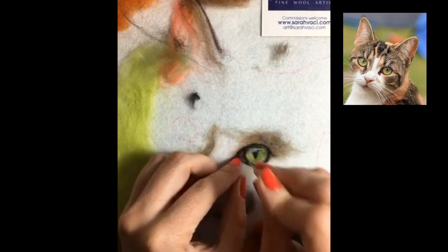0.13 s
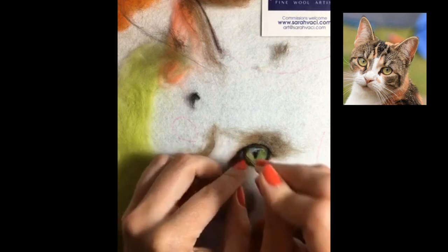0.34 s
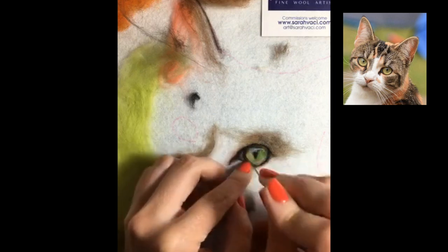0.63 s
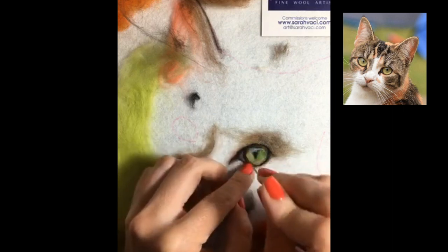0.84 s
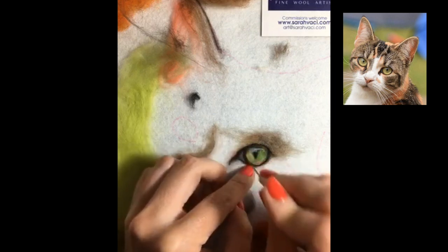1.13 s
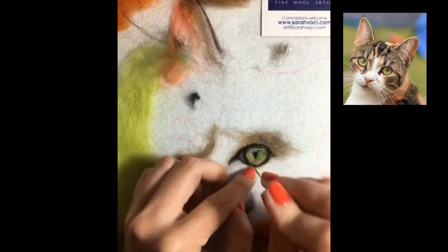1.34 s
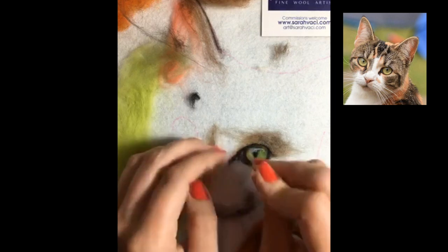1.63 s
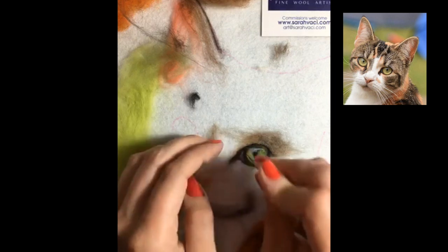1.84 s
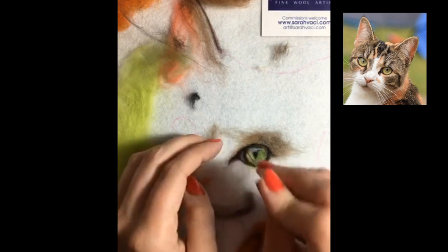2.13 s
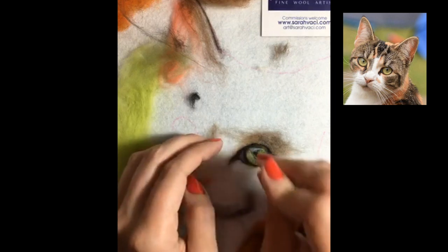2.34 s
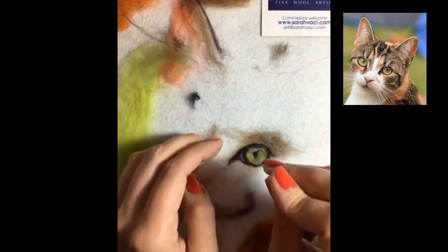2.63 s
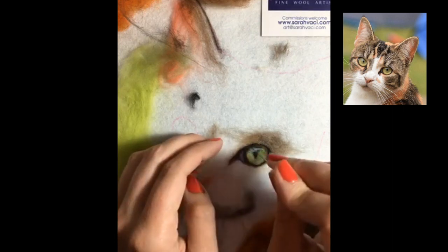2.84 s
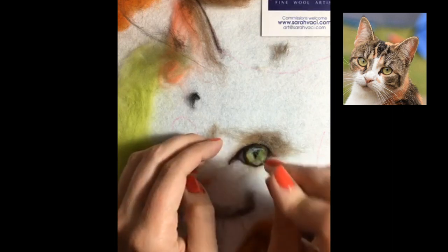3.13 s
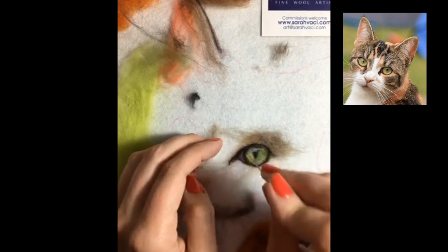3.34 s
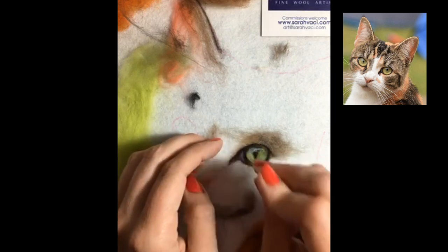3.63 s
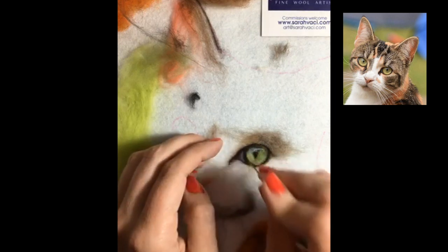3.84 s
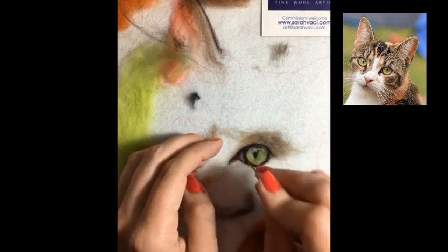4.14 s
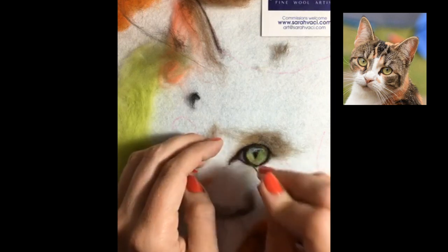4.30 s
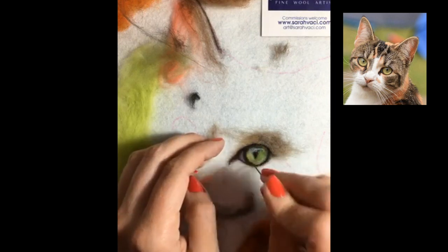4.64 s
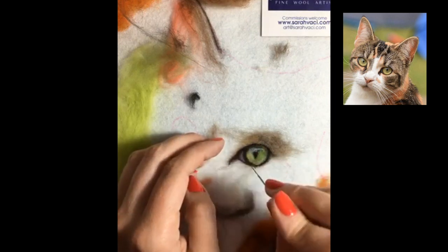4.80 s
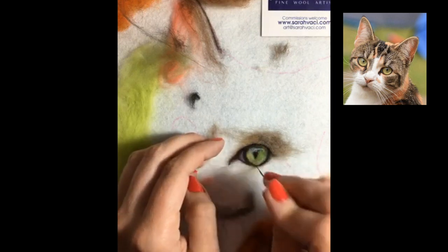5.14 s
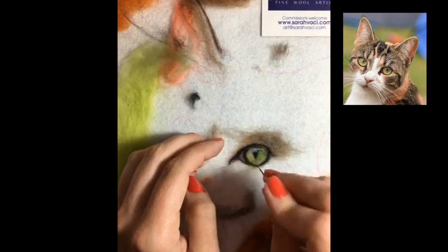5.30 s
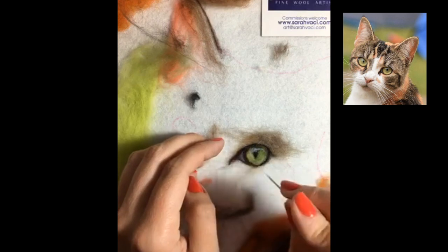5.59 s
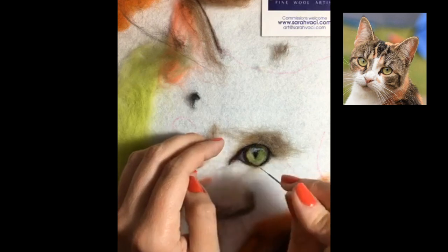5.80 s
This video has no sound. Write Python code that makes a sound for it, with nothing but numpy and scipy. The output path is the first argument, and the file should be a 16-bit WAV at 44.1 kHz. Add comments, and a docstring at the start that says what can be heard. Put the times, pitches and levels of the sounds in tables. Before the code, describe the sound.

A barbed felting needle jabs quickly into wool on a foam pad, making small, even crunches over a faint room hum.

```python
"""Needle felting, close up. Room rumble, a low hum and microphone hiss run throughout. From the start a
barbed needle jabs wool on a foam pad, 5-6 times a second. Each stab crunches: fibres catch on the barbs
and snap, thudding in the pad and fizzing above it; a softer scrape follows on the way out. The hum swells
near 1.6 s, then sinks in pitch. The needle pauses near 2.5 s, fingers brush the wool, and it resumes.
It pauses again near 4.8 s and stops at 5.5 s; three more brushes end the scene."""
import sys
import numpy as np
from scipy import signal
from scipy.fft import rfft, irfft
from scipy.io import wavfile

SR = 44100
rng = np.random.default_rng(int(sys.argv[2]) if len(sys.argv) > 2 else 0)


def dump(signal):
    """Clip the signal to [-1, 1] and save it as 16-bit WAV at the path in sys.argv[1]."""
    limited = np.clip(np.atleast_2d(signal).T, -1, 1)
    pcm = np.round(limited * 32767).astype(np.int16)
    wavfile.write(sys.argv[1], SR, pcm)


N = 262836

# room rumble spectrum: freq_hz, gain_db
RUMBLE_COLOUR = [(47, -30), (80, -6), (110, -5), (178, -14.5), (451, -25), (491, -26.5), (529, -24),
                 (1500, -32), (1950, -78), (3300, -120)]
# microphone hiss spectrum: freq_hz, gain_db
HISS_COLOUR = [(880, -54), (1500, -3), (1920, -1), (2010, -7.5), (2170, -1.5), (2350, -3.5), (2570, -3),
               (3410, -3), (3990, -5), (4890, -7.5), (6070, -3.5), (6690, -5.5), (11800, -2.5), (15500, -2)]
# hum fundamental, relative level: time_s, level_db
HUM_LEVEL = [(0, -48), (0.3, -45.5), (0.6, -55), (0.9, -49.5), (1.15, -58.5), (1.47, -54.5), (1.64, -40),
             (1.76, -53), (2.2, -55), (2.33, -45), (2.45, -59), (3.7, -54), (5.96, -57.5)]
# hum fundamental: time_s, pitch_hz
HUM_PITCH = [(0, 60.27), (1.6, 60), (2, 55.22), (5.96, 56.3)]
# hum second harmonic: time_s, level_db
HUM_OVERTONE = [(0, -54), (1, -64.5), (2.2, -74.5), (5.96, -69)]
# brushed wool spectrum: freq_hz, gain_db
WOOL_COLOUR = [(500, -9), (3500, -15), (8500, -13), (10500, -11), (12500, -1), (15000, 0.5)]
# finger strokes: centre_s, sigma_s, level_db
BRUSHES = [(2.666, 0.011, -57), (5.782, 0.022, -53), (5.868, 0.015, -52), (5.905, 0.018, -56)]
# resonances of pad and table: freq_hz, width_hz, gain_db
PAD_MODES = [(240, 62, 0.5), (381, 143, -13), (641, 45, -6.5), (791, 139, -8), (908, 142, -8.5),
             (1128, 46, -10.5), (1546, 308, -10), (2975, 550, -16), (3415, 363, -18)]
# pad response between resonances: freq_hz, gain_db
PAD_FLOOR = [(30, -20), (70, 0), (150, -12.5), (500, -11), (1200, -20), (2200, -32), (4000, -27),
             (8000, -28.5), (16000, -29.5)]
# pad's hollow 1.5 kHz resonance as the needle moves on: time_s, offset_db
PAD_HOLLOW = [(0.1, 2), (1.8, 1), (4.0, -0.5), (5.1, -3)]
# breaking fibre spectrum: freq_hz, gain_db
FIBRE_COLOUR = [(300, -10), (2000, -10.5), (3200, -25), (4100, -10), (4900, -6), (5400, 0.5), (5950, -5.5),
                (6600, 1.5), (7600, -6), (8900, 0), (10500, -4), (15000, 0.5)]
# spectrum of the shaft rubbing felt: freq_hz, gain_db
SHAFT_COLOUR = [(300, -42), (900, -14), (1600, 4), (2200, 1.5), (3100, -1.5), (4500, -1.5), (6400, -1.5),
                (8000, -9.5), (15000, -11.5)]
# thick tufts snapping, relative levels: time_s, thud_db, tick_db
THICK_TUFTS = [(0.271, -35, -52), (0.4599, -39.5, -50), (0.654, -39.5, -46), (0.851, -48, -49),
               (1.0174, -34, -39.5), (1.1737, -39.5, -51), (1.184, -36.5, -42.5), (1.3585, -36, -52),
               (1.5632, -36.5, -41), (1.5711, -44.5, -32.5), (1.7348, -33.5, -45), (1.753, -38.5, -39.5),
               (1.9448, -38, -38), (2.103, -40, -46), (2.1315, -36, -37.5), (2.281, -44.5, -48),
               (2.819, -38.5, -52), (2.8461, -44.5, -42.5), (2.9896, -34.5, -57), (3.01, -34, -37),
               (3.0198, -42.5, -44), (3.1742, -37.5, -60), (3.193, -36, -54), (3.355, -53, -43),
               (3.3918, -52, -38.5), (3.558, -37, -41), (3.7164, -36.5, -45), (3.7462, -39.5, -47),
               (3.8963, -43, -37), (4.0888, -37.5, -42), (4.2444, -38, -43.5), (4.5981, -48, -40.5),
               (5.0765, -53, -43.5), (5.1171, -49.5, -52), (5.218, -41.5, -39), (5.2393, -40.5, -42.5),
               (5.4086, -39.5, -44)]
# needle strokes, relative pad and fibre levels: enter_s, descent_s, crunch_db, fizz_db
STABS = [(0.078, 0.036, -47.5, -51.5), (0.267, 0.029, -45, -52.5), (0.453, 0.023, -46.5, -53),
         (0.632, 0.028, -49.5, -52), (0.815, 0.031, -48.5, -55), (0.992, 0.038, -48.5, -52),
         (1.17, 0.039, -47, -50), (1.355, 0.043, -47, -52), (1.542, 0.045, -46.5, -50),
         (1.73, 0.045, -45, -52.5), (1.912, 0.052, -47.5, -50.5), (2.104, 0.034, -44.5, -47.5),
         (2.277, 0.044, -45.5, -51.5), (2.767, 0.012, -56, -70), (2.816, 0.027, -50.5, -57),
         (2.989, 0.043, -45.5, -50), (3.17, 0.038, -45, -51), (3.349, 0.037, -43.5, -58),
         (3.531, 0.039, -46.5, -49), (3.711, 0.042, -45.5, -49), (3.886, 0.038, -44, -48),
         (4.058, 0.036, -44.5, -49), (4.227, 0.028, -45.5, -53.5), (4.394, 0.031, -45, -53),
         (4.558, 0.038, -46.5, -51), (5.026, 0.039, -47, -54), (5.214, 0.037, -45, -50.5),
         (5.389, 0.039, -45.5, -49.5)]


def gain_of(db):
    """Decibels to amplitude."""
    return 10 ** (np.asarray(db) / 20)


def unit_rms(x):
    """Scales to rms 1."""
    return x / np.sqrt(np.mean(x ** 2) + 1e-20)


def colour_gain(colour, hz):
    """Amplitude of a spectrum table, interpolated over log frequency."""
    freq_hz, gain_db = np.transpose(colour)
    return gain_of(np.interp(np.log(hz + 1), np.log(freq_hz + 1), gain_db))


def add(mix, start_s, sound):
    """Mixes a sound in at start_s."""
    part = mix[max(round(start_s * SR), 0):][:len(sound)]
    part += sound[:len(part)]


def drift(rate_hz):
    """Slow random motion, rms 1."""
    hz = np.fft.rfftfreq(N, 1 / SR)
    return unit_rms(irfft(rfft(rng.standard_normal(N)) * np.exp(-(hz / rate_hz) ** 2), N))


def response(colour, modes=(), size=4096):
    """Minimum-phase impulse response, energy 1: broad colour plus resonances."""
    hz = np.fft.rfftfreq(size, 1 / SR)
    power = colour_gain(colour, hz) ** 2
    for centre_hz, width_hz, db in modes:
        power += gain_of(db) ** 2 / (1 + 2 * ((hz - centre_hz) / width_hz) ** 2) ** 2
    cepstrum = irfft(np.log(power) / 2)
    cepstrum[1:size // 2] *= 2
    cepstrum[size // 2 + 1:] = 0
    ring = irfft(np.exp(rfft(cepstrum)))[:size // 2]
    return ring / np.linalg.norm(ring)


def through(x, ring):
    """Convolves with an impulse response."""
    return signal.oaconvolve(x, ring)[:N]


def steady_noise(colour, level_db):
    """Coloured noise at a constant rms level."""
    gain = colour_gain(colour, np.fft.rfftfreq(N, 1 / SR))
    return gain_of(level_db) * unit_rms(irfft(rfft(rng.standard_normal(N)) * gain, N))


def hum(trim_db=-1.5, waver_hz=2.476, flutter_db=2.5, sway_db=2.5):
    """Low room hum: swells, sways and wavers, with a rough overtone."""
    t = np.arange(N) / SR
    curves = HUM_LEVEL, HUM_PITCH, HUM_OVERTONE
    level_db, pitch_hz, overtone_db = (np.interp(t, *np.transpose(curve)) for curve in curves)
    phase = 2 * np.pi * np.cumsum(pitch_hz + waver_hz * drift(rate_hz=7.6)) / SR
    wobble_db = sway_db * drift(rate_hz=14.6) + flutter_db * drift(rate_hz=50)
    fundamental = gain_of(level_db + trim_db + wobble_db) * np.sin(phase)
    overtone = gain_of(overtone_db + 2 * drift(rate_hz=16)) * np.sin(2 * phase + drift(rate_hz=11))
    return np.sqrt(2) * (fundamental + overtone)


def room(x, wet_db=-16, t60_s=0.26, cutoff_hz=2000, echoes_per_s=3000, predelay_s=0.003):
    """Adds the faint, dull reflections of a small furnished room."""
    t = np.arange(SR // 3) / SR
    taps = rng.standard_normal(len(t)) * (rng.random(len(t)) < echoes_per_s / SR) * (t > predelay_s)
    tail = taps * gain_of(-60 * t / t60_s)
    tail = signal.lfilter(*signal.butter(1, cutoff_hz, fs=SR), tail / np.linalg.norm(tail))
    return x + gain_of(wet_db) * through(x, tail)


def fibre_slips(per_s, size, clump_db=3.0, clump_s=0.0016, spread_db=3.5):
    """Single fibres slip in bunches: random clicks, a few much larger than the rest; rms 1."""
    bunches = np.convolve(rng.standard_normal(size), np.hanning(round(2 * clump_s * SR)), "same")
    heights = gain_of(spread_db * np.minimum(rng.exponential(1, size), 3))
    clicks = heights * rng.choice([-1, 1], size) * (rng.random(size) < per_s / SR)
    return unit_rms(clicks * gain_of(clump_db * unit_rms(bunches)))


def finger_brushes():
    """Fingertips slide over loose wool: a faint, high rustle."""
    t = np.arange(N) / SR
    touch = sum(gain_of(db) * np.exp(-((t - centre_s) / sigma_s) ** 2 / 2)
                for centre_s, sigma_s, db in BRUSHES)
    slips = fibre_slips(per_s=6100, size=N, clump_db=5.5, clump_s=0.0017)
    return through(touch * slips, response(WOOL_COLOUR))


def pad_spot(time_s, detune=0.02):
    """Impulse response of one spot on the pad; each tunes and weights the resonances differently."""
    scatter = rng.standard_normal((len(PAD_MODES), 2))
    hollow_db = np.interp(time_s, *np.transpose(PAD_HOLLOW))
    modes = [(hz * (1 + detune * shift), width_hz, db + offset_db + hollow_db * (1400 < hz < 1700))
             for (hz, width_hz, db), (shift, offset_db) in zip(PAD_MODES, scatter)]
    return response(PAD_FLOOR, modes)


def pull_out(enter_s, descent_s, linger_s=0.04, usual_s=0.04, usual_db=-56.5, db_per_s=233):
    """Peak time and base level of the exit scrape; a longer, deeper stab scrapes louder."""
    return enter_s + descent_s + linger_s, usual_db + db_per_s * (descent_s - usual_s)


def thin_tufts(stab_row, count=2, spread_db=3.0, tilt_db=7.5, pierce_s=0.005, catch_jitter_s=0.0072):
    """Small snaps: the tip pierces the felt's skin, tufts tear going down, a barb catches coming out."""
    enter_s, descent_s, crunch_db, fizz_db = stab_row
    pierce = enter_s + pierce_s, crunch_db + 4, fizz_db + 0.5
    depth = (np.arange(count) + 1 + rng.random(count)) / (count + 1)
    thud_db, tick_db = 0.5 + spread_db * np.clip(rng.standard_normal((2, count)), -2, 2)
    depth_db = tilt_db * (depth - .5)  # deeper: less thud, more tick
    tears = zip(enter_s + descent_s * depth, crunch_db + thud_db - depth_db, fizz_db + tick_db + depth_db)
    exit_s, pull_db = pull_out(enter_s, descent_s)
    lateness, strength = np.clip(rng.standard_normal(2), -2, 2)
    catch_db = pull_db + 1 + spread_db * strength
    catch = exit_s + catch_jitter_s * lateness, catch_db, catch_db - 1.5
    return [pierce, *tears, catch]


def snap(tuft, pad_ring, fibre_ring, thud_trim_db=-1, thud_rise_s=0.00073, tick_rise_s=0.00049,
         strain_db=-13, strain_s=0.0031):
    """A tuft strains, then tears: a brief thud in the pad and a shorter, bright tick."""
    time_s, thud_db, tick_db = tuft
    t = np.arange(-SR // 200, SR // 150) / SR
    strain = gain_of(strain_db) * np.exp(-abs(t) / strain_s)
    thud = pad_ring, thud_db + thud_trim_db, thud_rise_s
    tick = fibre_ring, tick_db, tick_rise_s
    sound = 0
    for ring, db, rise_s in thud, tick:
        age = np.maximum(t / rise_s + .5, 0)
        force = age * np.exp(1 - age) + strain
        burst = through(force * rng.uniform(-1.012, 1, len(t)), ring)
        sound += gain_of(db) * burst / np.linalg.norm(burst)
    return time_s + t[0], np.sqrt(.003 * SR) * sound  # levels are rms over 3 ms


def stab(stab_row, pad_ring, fibre_ring, touch_db=-14, touch_lead_s=0.013, touch_s=0.0034,
         press_db=-5, press_s=0.032, relax_db=-8, relax_s=0.008, trim_db=-1,
         pull_s=0.016, pull_pad_db=-2, pull_shaft_db=-6.5):
    """One stroke: the tip scratches the loose top layer, presses, sinks in, stops and is drawn out."""
    enter_s, descent_s, crunch_db, fizz_db = stab_row
    stop_s = enter_s + descent_s
    exit_s, pull_db = pull_out(enter_s, descent_s)
    t = enter_s + np.arange(-SR // 15, SR // 5) / SR
    age_s = t - enter_s
    touch = gain_of(touch_db) * np.exp(-((age_s + touch_lead_s) / touch_s) ** 2 / 2)
    press = gain_of(press_db) * np.exp(-(age_s / press_s) ** 2 - abs(age_s) / press_s)
    relax = gain_of(relax_db) * np.exp(-abs(t - stop_s) / relax_s)
    stroke = np.where(t < enter_s, press, np.where(t < stop_s, 1, relax))
    pull = gain_of(pull_db) * np.exp(-((t - exit_s) / pull_s) ** 2 / 2)
    # deeper: the pad shakes less, more barbs rake the fibres
    depth = np.clip(age_s / descent_s, 0, 1) - .5
    pad_drive = gain_of(crunch_db + trim_db - 4.6 * depth) * stroke + gain_of(pull_pad_db) * pull
    fibre_drive = gain_of(fizz_db + trim_db + 7.4 * depth) * (stroke + touch)
    shaft_drive = gain_of(crunch_db) * touch + gain_of(pull_shaft_db) * pull
    coarse = fibre_slips(per_s=5000, size=len(t))
    fine = fibre_slips(per_s=20000, size=len(t))
    crunch = through(pad_drive * coarse, pad_ring)
    fizz = through(fibre_drive * unit_rms(fine + 0.12 * coarse), fibre_ring)
    rub = through(shaft_drive * unit_rms(fine + 0.39 * coarse), response(SHAFT_COLOUR))
    return t[0], crunch + fizz + rub


def needle():
    """All stabs; each tuft thuds through the pad spot of the stab that tears it."""
    mix = np.zeros(N)
    fibre_ring = response(FIBRE_COLOUR)
    entries_s = np.array(STABS)[:, 0]
    pad_rings = [pad_spot(enter_s) for enter_s in entries_s]
    for stab_row, pad_ring in zip(STABS, pad_rings):
        add(mix, *stab(stab_row, pad_ring, fibre_ring))
        for tuft in thin_tufts(stab_row):
            add(mix, *snap(tuft, pad_ring, fibre_ring))
    for tuft in THICK_TUFTS:
        nearest = np.argmin(abs(entries_s - tuft[0]))
        add(mix, *snap(tuft, pad_rings[nearest], fibre_ring))
    return mix


def scene():
    """Needle and fingers over hum, rumble and hiss; mono."""
    mix = room(needle()) + finger_brushes() + hum()
    mix += steady_noise(RUMBLE_COLOUR, level_db=-60)
    mix += steady_noise(HISS_COLOUR, level_db=-63.5)
    return mix[None]


def record(dry):
    """Recorder band limit: steep low-pass at 15.6 kHz."""
    low_pass = signal.firwin(511, 15600, window=("kaiser", 9), fs=SR)
    return signal.oaconvolve(dry, low_pass[None], "same")


dry = scene()
out = record(dry)
dump(out)
```